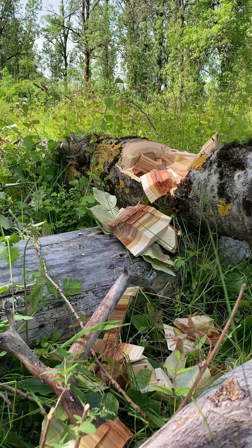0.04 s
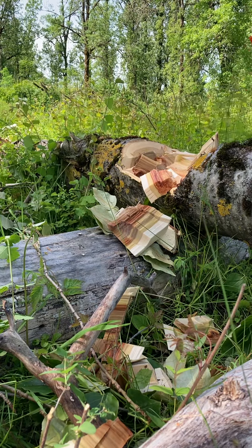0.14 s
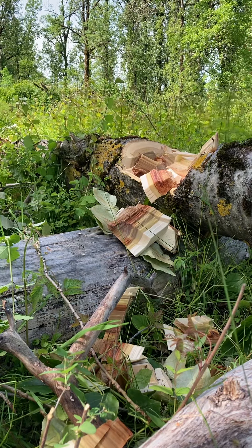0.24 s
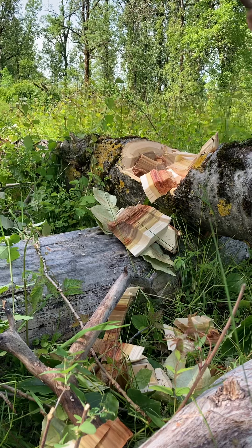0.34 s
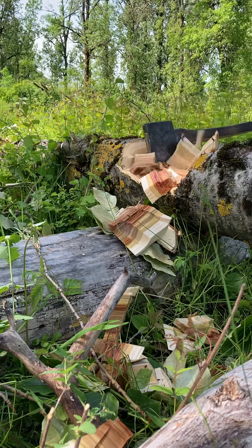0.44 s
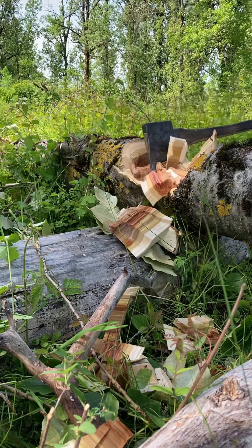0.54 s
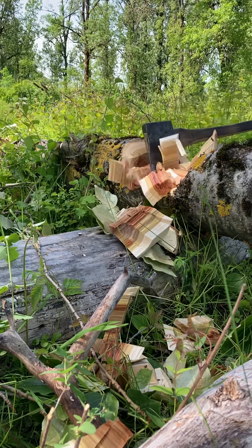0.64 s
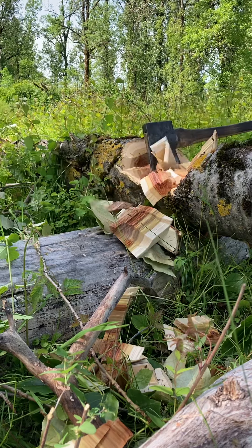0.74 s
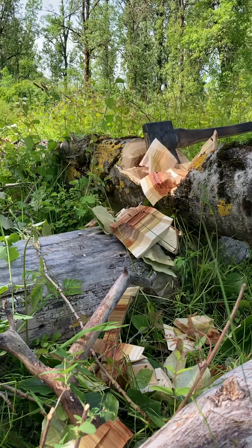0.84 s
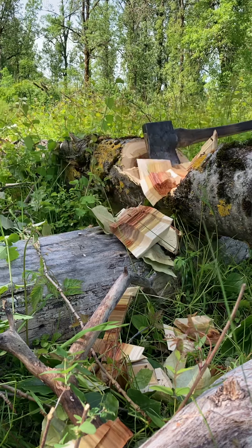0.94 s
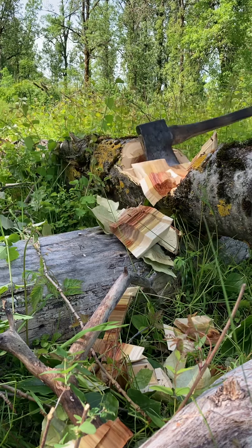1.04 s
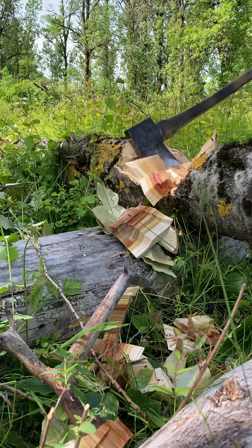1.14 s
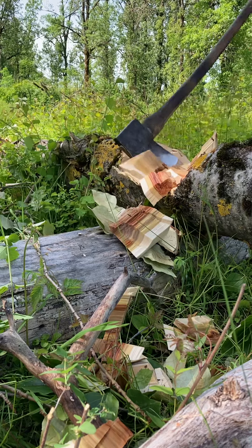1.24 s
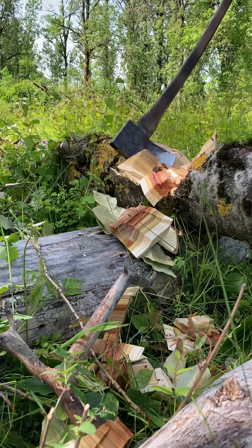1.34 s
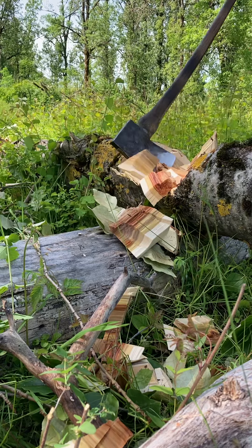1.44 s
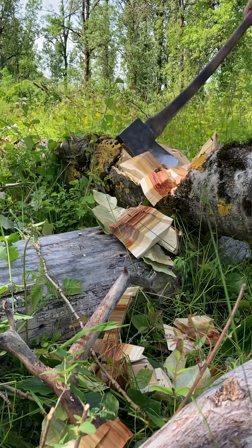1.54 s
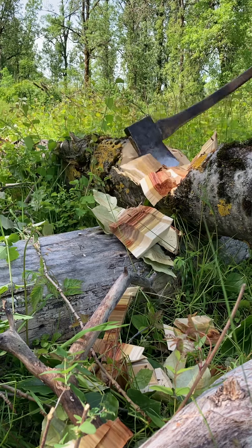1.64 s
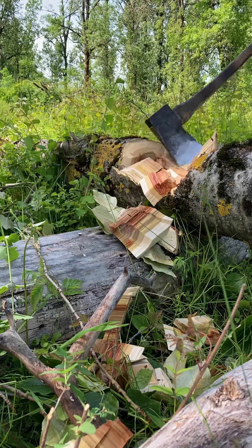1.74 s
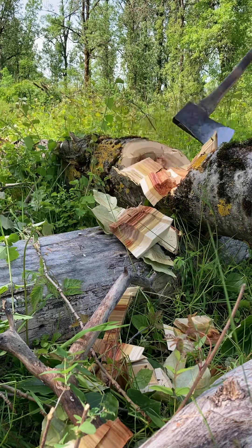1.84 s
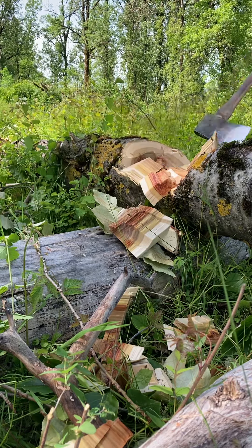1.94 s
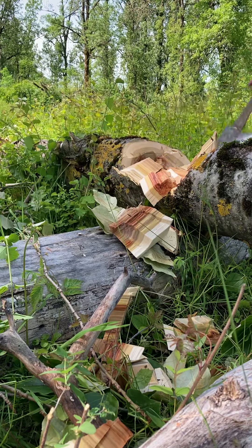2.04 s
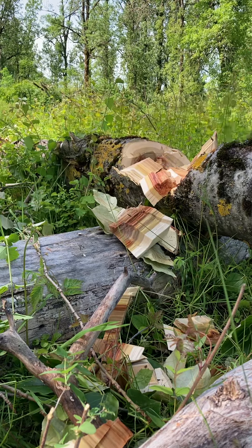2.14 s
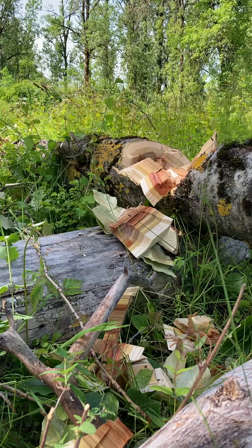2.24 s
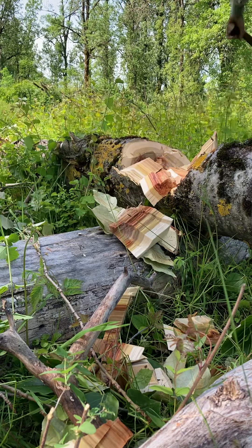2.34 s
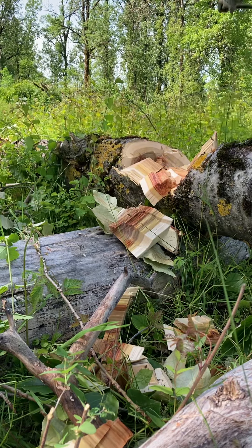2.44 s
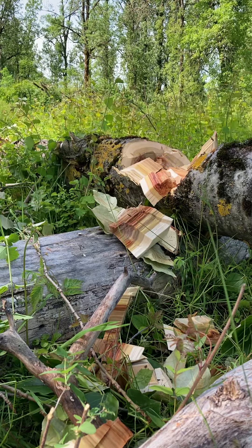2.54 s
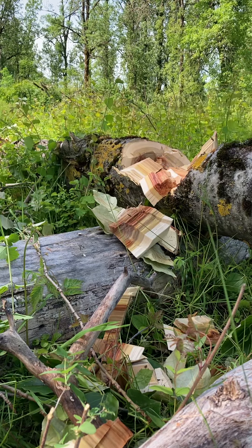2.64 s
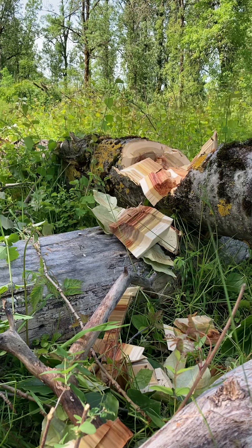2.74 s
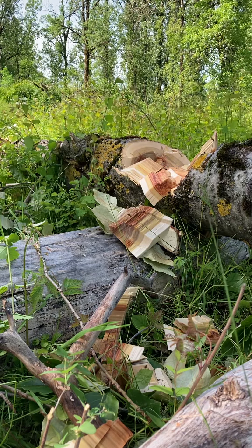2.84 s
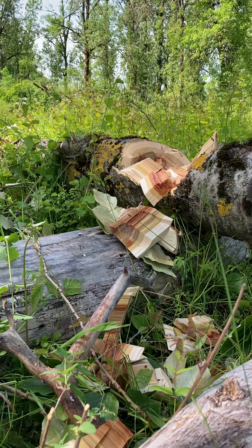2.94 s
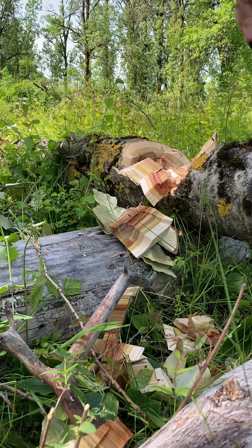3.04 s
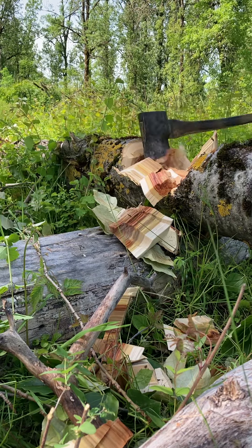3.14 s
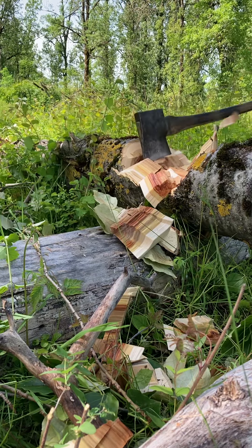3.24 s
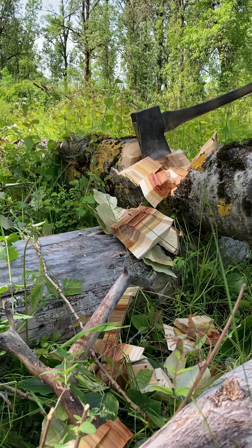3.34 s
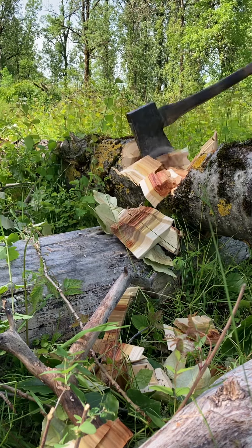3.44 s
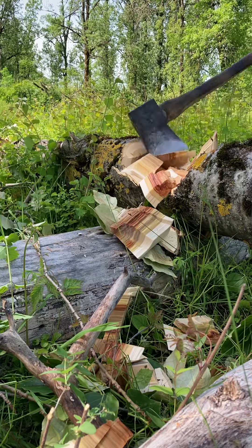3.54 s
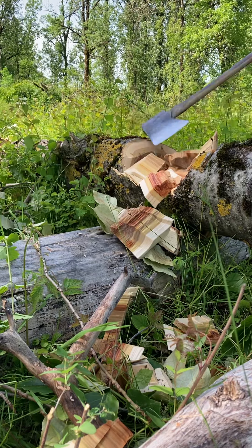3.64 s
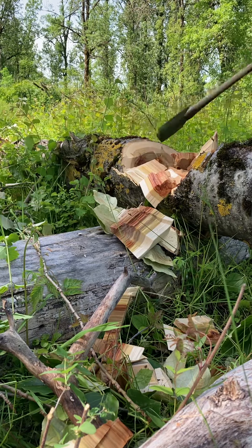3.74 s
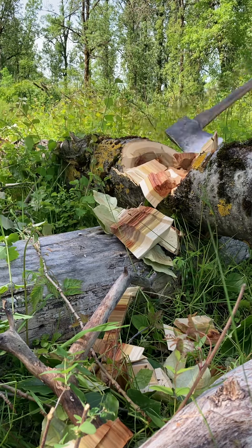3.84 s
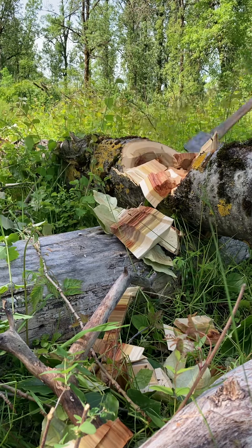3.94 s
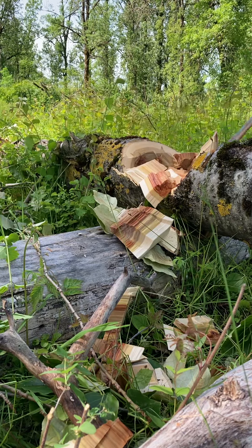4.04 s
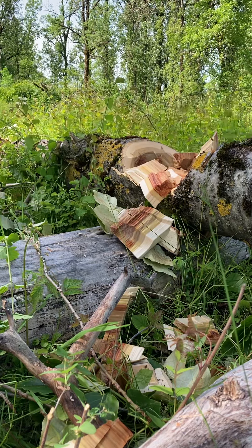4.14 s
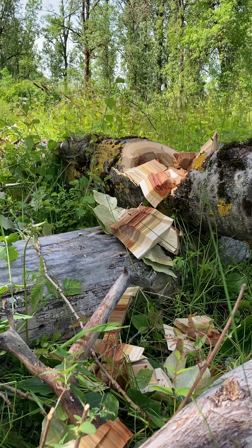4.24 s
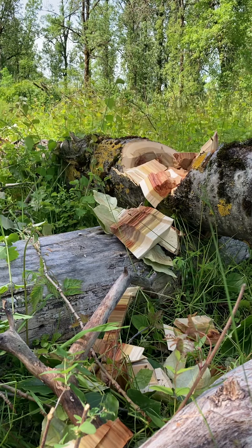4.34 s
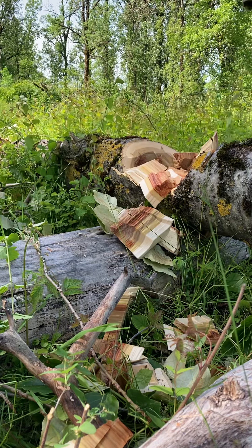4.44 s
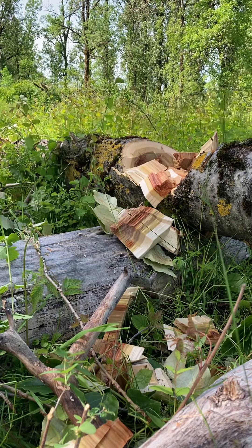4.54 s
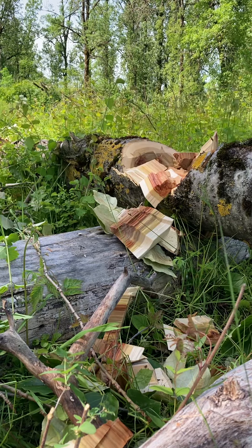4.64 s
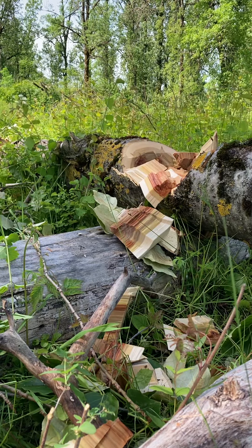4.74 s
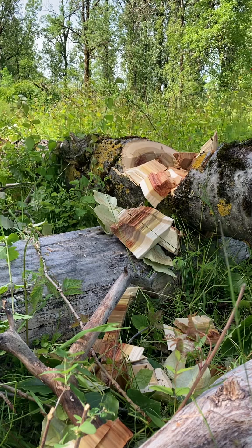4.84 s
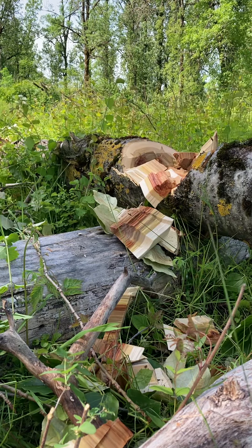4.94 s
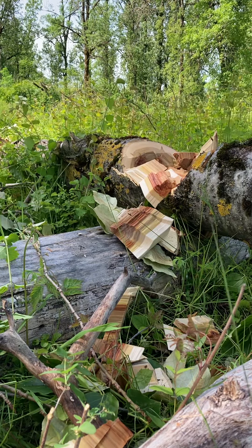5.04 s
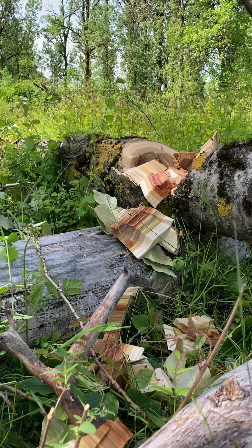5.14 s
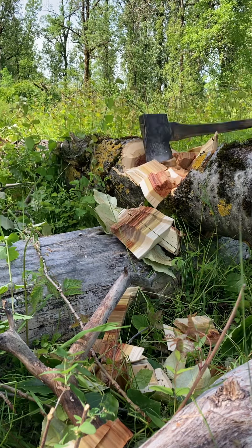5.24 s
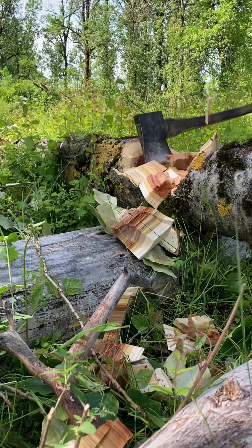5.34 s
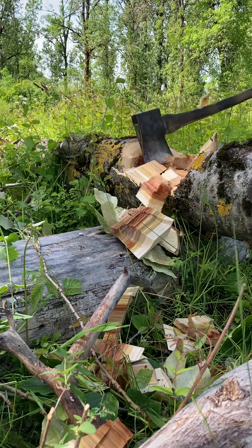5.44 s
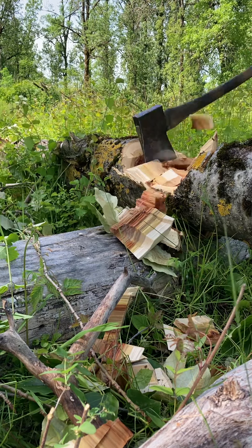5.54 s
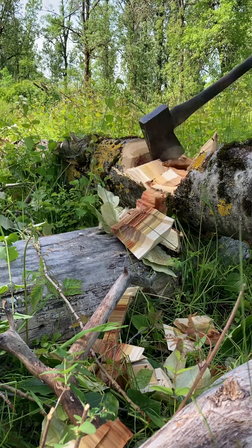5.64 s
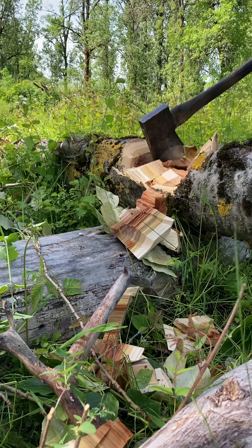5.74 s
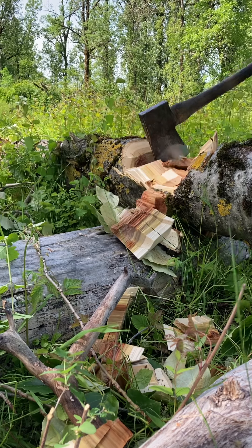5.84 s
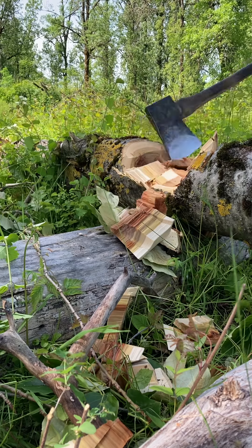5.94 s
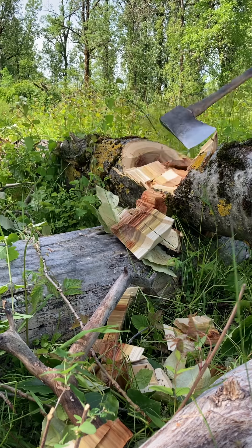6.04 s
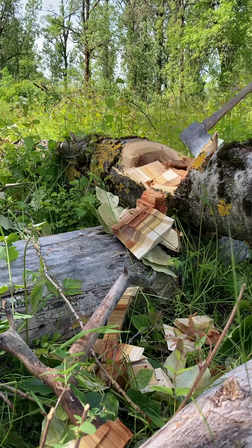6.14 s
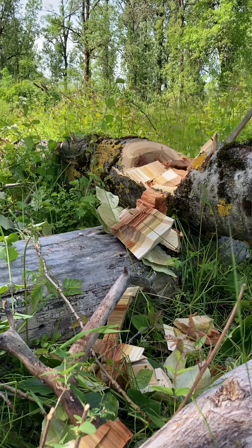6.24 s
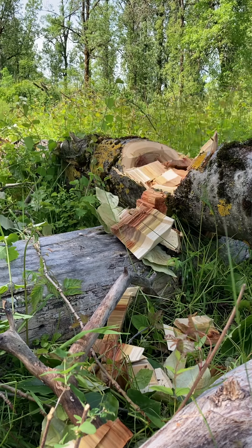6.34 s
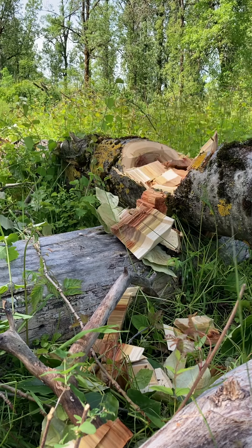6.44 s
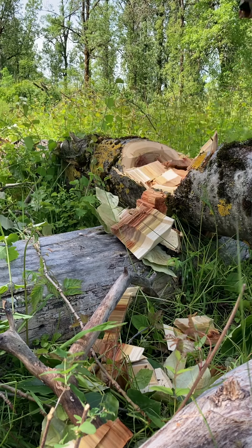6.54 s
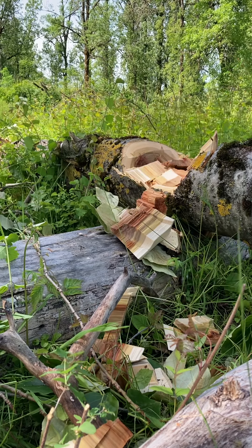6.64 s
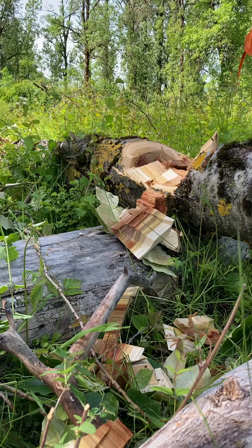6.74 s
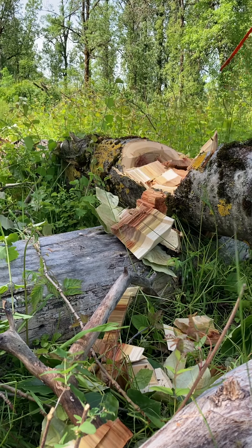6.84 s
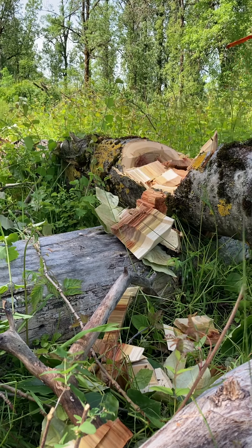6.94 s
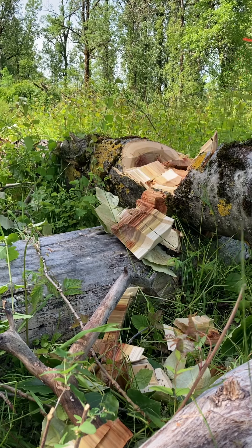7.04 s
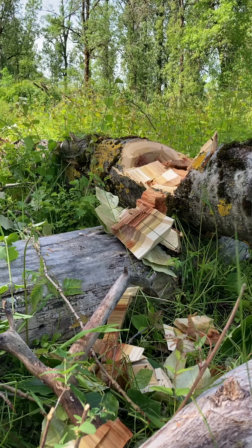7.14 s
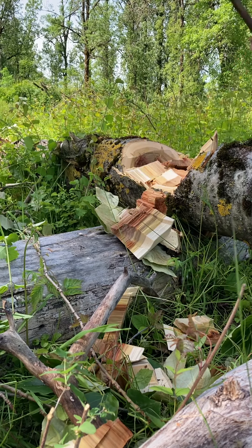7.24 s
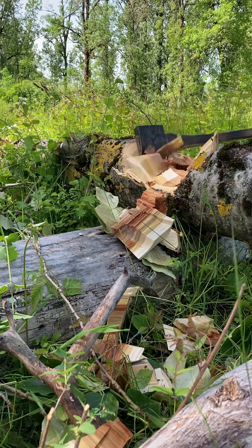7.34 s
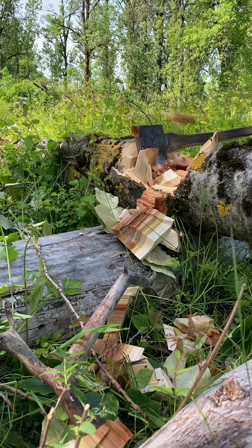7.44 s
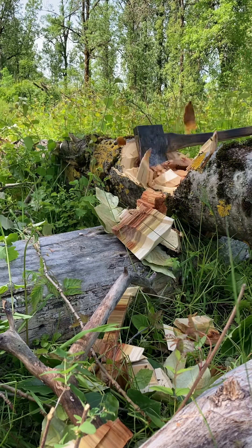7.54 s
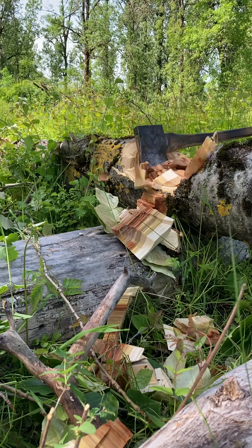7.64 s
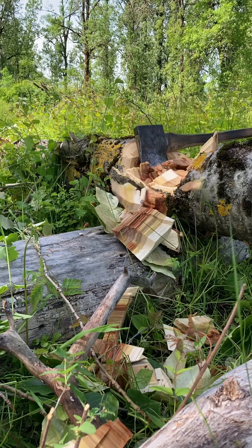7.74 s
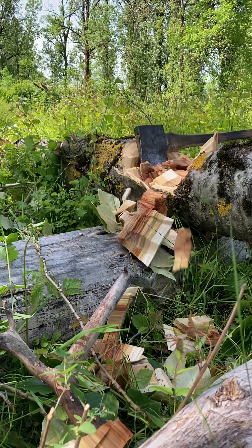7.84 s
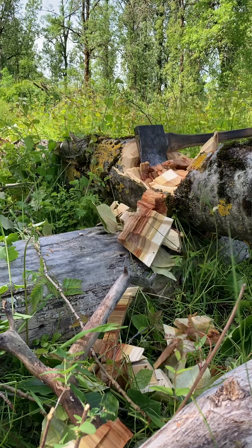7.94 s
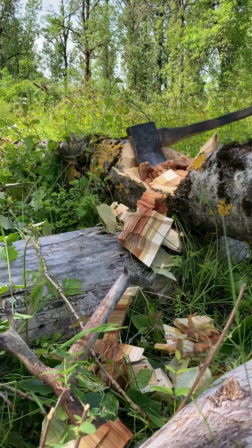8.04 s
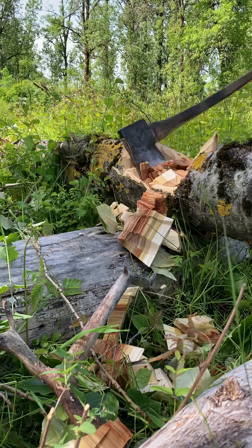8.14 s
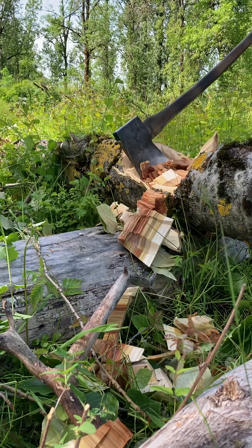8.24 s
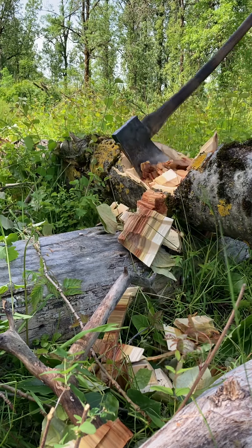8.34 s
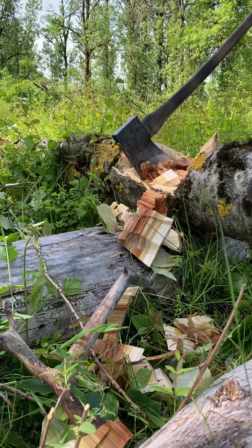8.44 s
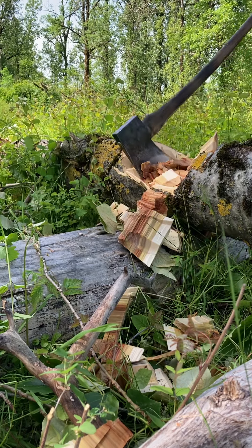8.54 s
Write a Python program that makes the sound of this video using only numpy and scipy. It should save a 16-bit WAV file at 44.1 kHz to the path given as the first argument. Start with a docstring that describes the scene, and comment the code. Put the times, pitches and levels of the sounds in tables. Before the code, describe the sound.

Close stereo outdoors: an axe strikes a felled log four times, a few seconds apart. Each blow is a sharp crack and hollow woody knock with a short low thump and faint echo off trees. Chips tick and clack afterwards, the wedged blade creaks, grass rustles. Thin falling bird whistles fill the gaps over a low wavering engine drone and distant traffic.

```python
"""The edge of a wood: an axe bites four times into a felled log, close to a stereo microphone.
Each blow is noise for the tearing fibres, damped modes for notch and trunk, and a faint noise echo off the trees.
Chips knock as short rings, the wedged blade creaks in slips and slides out singing, and grass is a hiss of contacts.
Behind are birds on gliding sines, far ones blurred by the trunks, and a far engine's drone in a wash of traffic."""
import sys
import numpy as np
from scipy import signal
from scipy.fft import rfft, irfft, next_fast_len
from scipy.io import wavfile
from scipy.ndimage import uniform_filter1d

SR = 44100
rng = np.random.default_rng(int(sys.argv[2]) if len(sys.argv) > 2 else 0)


def transcribe(signal):
    """Save signal, clipped to [-1, 1], as a 16-bit WAV file at the path in sys.argv[1]."""
    frames = np.atleast_2d(signal).T
    limited = np.clip(frames, -1, 1)
    pcm = np.round(limited * 32767).astype(np.int16)
    wavfile.write(sys.argv[1], SR, pcm)


N = 378815
PADDED = next_fast_len(N, real=True)
THIRDS = np.geomspace(80, 16000, 24)  # centres of third-octave bands [Hz]

# Table levels are relative: the functions that play them weigh and sum them.

# Axe blows, close by: (time [s], knock level [dB], frequency where the knock is strongest [Hz],
#   frequency of a dip in the blow's colour [Hz], notch pitch [factor], edge click level [dB], crack level [dB],
#   splintering level [dB], slowness of the cut [factor], trunk delay [s], trunk level [dB],
#   second thump delay [s], second thump level [dB], echo level [dB], bright tail level [dB])
BLOWS = [(0.4330, 8.7, 540, 1480, 1.013, -10, -1.5, -12.5, .85, .0107, 2.7, .0327, -1.4, -4, -51),
         (3.1475, -2, 1150, 620, 1.025, -2.5, 0, -9.5, .78, .0107, -5.5, .0362, -7.8, -2, -50),
         (5.2205, 2.5, 560, 3500, 1.03, -10, -8, -1, 1.7, .0133, .4, .0389, -1.1, -3, -38),
         (7.3255, 5.5, 950, 560, 1.0, -11, -1, -6, 1.2, .0135, -3, .0354, -5.6, -3, -50)]
# Short extra cracks within each blow, each with its own pitch: (time [s], level [dB], pitch [Hz])
EXTRA_CRACKS = [(0.4375, -17, 1680), (3.1495, -19.5, 5400), (3.1525, -22, 1700), (3.1585, -25, 400),
                (5.2225, -22, 2400), (5.2310, -25, 810), (5.2360, -27, 1300), (5.2375, -24, 560),
                (7.3285, -20, 2950), (7.3310, -20, 1850), (7.3335, -14, 1200), (7.3355, -15, 1010),
                (7.3365, -19, 690)]
# Second low thump of the log, about 25 ms after the first: (frequency [Hz], level [dB], t60 [s])
SECOND_THUMP = [(201, -12.2, .061), (287, -9.5, .077), (327, -6.5, .042), (395, -18.1, .032)]
# Echo of the trees, in third octaves: (frequency [Hz], level [dB])
TREE_ECHO = [(80, -70), (300, -64), (1000, -67), (2000, -65), (2700, -60), (4200, -70), (8000, -70),
             (16000, -86)]
CRACK_CYCLES = 30  # damping span of an extra crack [cycles]; tap() takes fractions of it


def axe():
    """The blows crack and stir the trunk, a second low thump follows, and the trees scatter the sound to each port."""
    t = np.arange(2 ** 15) / SR
    near, far = np.zeros(N), np.zeros((2, N))
    for s, *cut, trunk_s, trunk_db, thump_s, thump_db, echo_db, tail_db in BLOWS:
        add(near, *chop(s, *cut, t[:2 ** 13] - .03))
        add(near, s, bright_tail(tail_db, t))
        add(near, s + trunk_s, amp(trunk_db) * trunk(t))
        add(near, s + thump_s, amp(thump_db) * ring(SECOND_THUMP, t, rise=.0022))
        for side in far:
            echo_shape = swell(t - .09, rise=.9, t60=1.1)
            add(side, s, puff(read(TREE_ECHO, THIRDS) + echo_db, echo_shape, grain_db=5))
    around = np.arange(-2 ** 8, 2 ** 12 - 2 ** 8) / SR
    for s, db, hz in EXTRA_CRACKS:
        add(near, s + around[0], tap(around, db, hz, CRACK_CYCLES / hz, scuff_db=-5))
    return near + far


# Wood around the notch, before each blow's pitch factor: (frequency [Hz], level [dB], t60 [s])
NOTCH_MODES = [(183, -9.1, .077), (299, -14.4, .048), (422, -8.2, .04), (636, -11, .036), (791, -9.6, .042),
               (1001, -8, .033), (1183, -11, .033), (1568, -15, .029), (1768, -10, .028), (2010, -12, .03),
               (2317, -10.5, .028), (2560, -12, .036)]
# Tearing fibres, in third octaves: (frequency [Hz], level [dB])
FIBRE_CRACK = [(300, -31), (700, -21), (1100, -17), (1700, -18), (2600, -18), (3500, -22), (5000, -24),
               (7000, -30), (16000, -44)]
# Fine splinters, in third octaves: (frequency [Hz], level [dB])
FINE_SPLINTERS = [(300, -70), (3000, -30), (5200, -18), (6800, -22), (8600, -7), (10500, -21), (13000, -24),
                  (16000, -22)]
# The edge's first click into the wood, in third octaves: (frequency [Hz], level [dB])
EDGE_CLICK = [(300, -60), (2000, -26), (3500, -19), (5200, -16), (6500, -20), (8600, -12), (12500, -20),
              (16000, -17)]
CLICK_RISE_S, CLICK_T60_S = .004, .014
OFF_CENTRE_DB_PER_OCTAVE = 4.8  # loss away from the frequency where the knock is strongest


def chop(s, knock_db, strongest_hz, dip_hz, pitch, click_db, crack_db, splinter_db, slowness, t):
    """The edge clicks in; fibres tear from bright to dull as the blade slows; the notch knocks in damped modes."""
    depth = (1000 / THIRDS[:, None]) ** .5  # duller bands start later and last longer
    age = t - .0006 - slowness * .0028 * depth
    scatter = amp(-22) * depth ** .4 * swell(age, rise=.055 * depth ** .3, t60=.1)
    tear = swell(age, rise=.02 * depth ** .5, t60=.036 * slowness ** .6 * depth ** .6) + scatter
    fibres = amp(read(FIBRE_CRACK, THIRDS) + crack_db)
    splinters = amp(read(FINE_SPLINTERS, THIRDS) + splinter_db)
    tear_db = 10 * np.log10(fibres ** 2 + splinters ** 2)
    crack = burst(tear_db + .5 * dip(THIRDS, dip_hz), tear, grain_db=4)

    modes = []
    for notch_hz, db, t60 in NOTCH_MODES:
        hz = notch_hz * pitch
        off_centre_db = OFF_CENTRE_DB_PER_OCTAVE * abs(np.log2(hz / strongest_hz))
        modes.append((hz, db + knock_db - off_centre_db + dip(hz, dip_hz), t60))
    knock = ring(modes, t, rise=.0025, lag=.007 * slowness)

    click_shape = swell(t - .0012, CLICK_RISE_S, CLICK_T60_S)
    click = puff(read(EDGE_CLICK, THIRDS) + click_db, click_shape, grain_db=2)
    return s + t[0], click + crack + knock


DIP_DB, DIP_OCTAVES = -16, .2  # deepest loss, and its reach to either side


def dip(hz, dip_hz):
    """Loss in dB around a dip in the blow's colour."""
    return DIP_DB * np.exp(-(np.log2(hz / dip_hz) / DIP_OCTAVES) ** 2)


# Bright tail after the crack, in third octaves: (frequency [Hz], level [dB])
BRIGHT_TAIL = [(300, -60), (2600, -7), (5200, -9), (6800, -7), (8600, 0), (10500, -9), (13000, -19),
               (16000, -21)]
TAIL_CLUMP_DB, TAIL_DELAY_S, TAIL_T60_S = 3, .018, .17


def bright_tail(db, t):
    """A short, uneven tail of bright noise after the crack."""
    clumps = evened(amp(TAIL_CLUMP_DB * wander(len(t), hz=120)))
    shape = clumps * swell(t - TAIL_DELAY_S, rise=.04, t60=TAIL_T60_S)
    return puff(read(BRIGHT_TAIL, THIRDS) + db, shape, grain_db=4)


# The whole log: (frequency [Hz], level [dB], t60 [s])
LOG_MODES = [(85, -26, .6), (160, -24, .354), (200, -21.6, .39), (245, -29.7, .38), (279, -18.4, .247),
             (319, -19.3, .195), (355, -22, .2), (397, -22.5, .17), (434, -31, .162), (489, -35, .17),
             (574, -34, .15), (680, -29, .13), (812, -30, .1), (1005, -36, .09)]
# The log's dull rumble, in third octaves: (frequency [Hz], level [dB])
LOG_RUMBLE = [(80, -35), (150, -32), (300, -32), (450, -44), (700, -50), (1200, -66), (16000, -100)]


def trunk(t):
    """The whole log rings along its length, its lowest modes longest, over a dull rumble."""
    rumble = puff(read(LOG_RUMBLE, THIRDS) - 4.5, swell(t - .02, rise=.06, t60=.3), grain_db=0)
    return ring(LOG_MODES, t, rise=.003) + rumble


# Chips landing and the blade nudging the wood: (time [s], hollow knock level [dB], knock pitch [Hz],
#   bright clack level [dB], clack pitch [Hz], trunk level [dB])
CHIPS = [(0.771, -48, 1080, -45, 2800, -52), (0.889, -48, 480, -66, 2200, -42),
         (0.991, -35, 660, -38, 1800, -29), (0.997, -43, 900, -48, 2500, -42),
         (1.021, -51, 550, -66, 2000, -45), (3.402, -54, 1100, -51, 1900, -58),
         (3.427, -52, 1000, -50, 2100, -56), (3.458, -52, 1100, -60, 2200, -58),
         (3.615, -33.5, 845, -50, 2500, -42), (3.661, -38, 1160, -53, 2600, -44),
         (3.704, -46, 950, -60, 1700, -48), (5.547, -51, 1150, -49, 2000, -56),
         (6.495, -62, 900, -56, 2200, -58), (7.851, -60, 800, -49, 2900, -54),
         (7.863, -48, 540, -47, 2000, -41), (7.951, -56, 1200, -50, 3800, -56),
         (7.975, -40, 960, -38, 2080, -36), (7.982, -39, 450, -47, 1400, -38),
         (8.049, -56, 1400, -51, 2700, -54)]
# Overtones of a hollow knock: (multiple of the knock pitch [ratio], level [dB], t60 [s])
HOLLOW_OVERTONES = [(1.35, -13, .03), (1.8, -11, .035), (2.3, -18, .03)]
# The loudest stalks snapping: (time [s], level [dB])
SNAPS = [(0.528, -52.5), (0.733, -49.5), (0.772, -49.5), (2.108, -51.5), (3.372, -45), (3.537, -47),
         (3.614, -46), (3.661, -52), (4.257, -47), (4.408, -49), (5.124, -46), (5.143, -51), (5.547, -45),
         (5.624, -49), (7.108, -57), (7.654, -46), (7.728, -53), (7.85, -51), (8.113, -49)]
# Colour of leaves and stalks: (frequency [Hz], level [dB])
LEAVES = [(300, -40), (2000, -15), (4000, -10), (6000, -6), (8500, -1), (11000, -4), (14000, -7),
          (16000, -14)]
KNOCK_DAMPING_S, CLACK_DAMPING_S = .062, .03  # tap() takes fractions of these


def debris():
    """Chips knock and clack and stir the trunk; stalks snap as short bright noise."""
    t, out = np.arange(-2 ** 8, 2 ** 12 - 2 ** 8) / SR, np.zeros(N)
    for s, knock_db, hz, clack_db, clack_hz, trunk_db in CHIPS:
        modes = [(hz * ratio, knock_db + db, t60) for ratio, db, t60 in HOLLOW_OVERTONES]
        overtones = ring(modes, t, rise=.001)
        knock = tap(t, knock_db, hz, KNOCK_DAMPING_S, scuff_db=-5) + overtones
        clack = tap(t, clack_db, clack_hz, CLACK_DAMPING_S, scuff_db=-1)
        add(out, s + t[0], knock + clack)
        add(out, s, amp(trunk_db) * trunk(np.arange(2 ** 14) / SR))
    for s, db in SNAPS:
        snap = puff(db - 4 + read(LEAVES, THIRDS), swell(t, rise=.005, t60=.04), grain_db=5)
        add(out, s + t[0], snap)
    return out


TAP_DB_PER_OCTAVE, TAP_RISE_S = 9, .005  # the slope is exact one octave away and steepens beyond


def tap(t, db, hz, damping_s, scuff_db):
    """A short knock or crack of wood: a tick of noise over a quickly damped resonance."""
    colour_db = -TAP_DB_PER_OCTAVE * abs(np.log2(THIRDS / hz)) ** 1.4
    tick_shape = swell(t, rise=TAP_RISE_S, t60=.8 * damping_s)
    tick = puff(db + scuff_db + colour_db, tick_shape, grain_db=4)
    return tick + ring([(hz, db + 2.5, .7 * damping_s)], t, rise=.0007)


# The blade rocks in the cut and splinters rub: (time [s], length [s], level [dB], centre frequency [Hz])
SCRAPES = [(1.02, .17, -63, 2100), (3.24, .15, -58.5, 2800), (3.258, .018, -53, 3100),
           (3.385, .055, -55.5, 2300), (3.522, .07, -54, 2500), (3.62, .07, -63, 2000),
           (4.14, .13, -68, 2600), (7.365, .07, -59, 2800), (7.425, .115, -54.5, 2750),
           (7.835, .06, -60, 2700), (7.925, .035, -55, 3200), (8.02, .14, -56.5, 2400)]
# A splinter plucked by a slip: (multiple of the centre frequency [ratio], level [dB], t60 [s])
SPLINTER_MODES = [(.41, -7, .012), (.55, -5, .01), (.73, -3.5, .009), (1, 0, .012), (1.35, -8, .005),
                  (2, -8, .003)]
SLIPS_PER_S, SLIP_DB = 110, -2  # approximate rate, and level against the scrape
SLIP_SPREAD_DB, SLIP_DETUNE = 20, .25  # full range of random softness, and of pitch as a share
SCRAPE_DB_PER_OCTAVE, SCRAPE_RUB_DB = 9, -6  # slope one octave away; the rub against the scrape


def creaks():
    """The wedged blade sticks and slips: each uneven slip rings a splinter, over a dry rub."""
    t, out = np.arange(2 ** 10) / SR, np.zeros(N)
    for s, length, db, hz in SCRAPES:
        size = next_fast_len(int(length * SR))
        stroke = signal.windows.tukey(size, .7) * evened(amp(3 * wander(SR, hz=45)[:size]))
        colour_db = -SCRAPE_DB_PER_OCTAVE * abs(np.log2(THIRDS / hz)) ** 1.2
        add(out, s, puff(db + SCRAPE_RUB_DB + colour_db, stroke, grain_db=6))

        count = int(length * SLIPS_PER_S) + 1
        slips = np.zeros(size + len(t))
        for k, (when, softness, pitch) in enumerate(rng.random((count, 3))):
            place = (k + when) / count  # share of the scrape gone by
            centre_hz = hz * (1 + SLIP_DETUNE * (pitch - .5))
            modes = [(centre_hz * ratio, mode_db - SLIP_SPREAD_DB * softness, t60)
                     for ratio, mode_db, t60 in SPLINTER_MODES]
            pressure = np.sin(np.pi * place) ** .5
            add(slips, place * length, pressure * ring(modes, t, rise=.0002))
        add(out, s, amp(db + SLIP_DB) * evened(slips) * np.sqrt(size / len(slips)))
    return out


# The blade slides out of the cut: (time [s], length [s], level [dB])
SLIDES = [(1.68, 0.02, -69), (5.87, .12, -75), (5.976, .025, -62)]
# The singing steel: (frequency [Hz], level [dB], t60 [s])
BLADE_MODES = [(2700, -2, .035), (5050, -2, .025), (7980, 0, .04), (9400, -12, .03), (11300, -7, .03),
               (12700, -10, .03), (14250, -7, .07)]
RUB_DB = -3  # the dry rubbing under the ring of the steel


def blade():
    """Wood rubs the steel head: noise drives the modes of the blade, which sings faintly."""
    out, steel = np.zeros(N), ring(BLADE_MODES, np.arange(2 ** 12) / SR, rise=.001)
    for s, length, db in SLIDES:
        stroke = np.hanning(int(length * SR))
        friction = rng.standard_normal(len(stroke)) * stroke
        add(out, s, amp(db - 5.5) * evened(signal.fftconvolve(friction, steel)))
        add(out, s, puff(db + RUB_DB + read(LEAVES, THIRDS), stroke, grain_db=4))
    return out


# Grass brushed by a step or a falling chip: (time of the peak [s], time to die away [s], level [dB])
RUSTLES = [(0.24, 1.2, -77), (0.82, .9, -67), (1.2, 3.0, -70), (1.72, .4, -68), (2.11, .9, -67),
           (2.35, .3, -61), (3.4, .5, -62.5), (3.56, .5, -59.5), (3.82, .45, -60), (4.21, .6, -56),
           (5.13, .4, -69), (5.56, .9, -66), (6.34, .6, -59), (6.5, .5, -67), (7.17, .9, -76),
           (7.94, .7, -55), (8.3, 1.2, -72)]
# Faint hiss of leaves between the rustles: (time [s], level [dB])
BREEZE = [(0.0, -85), (0.65, -75), (4.16, -78), (4.88, -91), (5.4, -68), (6.17, -89), (8.06, -71),
          (8.59, -83)]
BREEZE_GAIN_DB = -2
RUSTLE_RISE_SHARE = .45  # a rustle builds up in this share of the time it takes to die
SHAKE_DELAY_S, SHAKE_RISE_S, SHAKE_T60_S = .04, .1, .8  # each blow shakes the plants around the log
SHAKE_DB = -58.5  # added to the blow's splintering level
CONTACTS_PER_S, CONTACT_SPREAD_DB = 7000, 2.6
FLUTTER_DB, FLUTTER_HZ = 2.6, 30  # leaves are touched in small uneven clumps


def grass():
    """Countless tiny leaf contacts, swelling as the plants are brushed or shaken by a blow."""
    hz, t = np.fft.rfftfreq(PADDED, 1 / SR), np.arange(N) / SR
    sizes = amp(CONTACT_SPREAD_DB * np.minimum(rng.exponential(1, N), 5))
    contacts = rng.standard_normal(N) * (rng.random(N) < CONTACTS_PER_S / SR) * sizes
    colour = amp(read(LEAVES, hz)) / np.sqrt(hz + 1)
    hiss = irfft(rfft(contacts, PADDED) * colour, PADDED)[:N]

    slow = t[::2 ** 6]
    power = amp(np.interp(slow, *np.transpose(BREEZE)) + BREEZE_GAIN_DB) ** 2
    for s, fade_s, db in RUSTLES:
        power += (amp(db + 2) * swell(slow - s, RUSTLE_RISE_SHARE * fade_s, fade_s)) ** 2
    for s, _, _, _, _, _, _, splinter_db, *_ in BLOWS:
        shake = swell(slow - s - SHAKE_DELAY_S, SHAKE_RISE_S, SHAKE_T60_S)
        power += (amp(SHAKE_DB + splinter_db) * shake) ** 2
    flutter = amp(FLUTTER_DB * wander(PADDED, FLUTTER_HZ)[:N])
    return evened(hiss * flutter) * np.sqrt(np.interp(t, slow, power))


# A bird's whistles, each gliding to a resting note: (time [s], length [s], first pitch [Hz],
#   resting pitch [Hz], bend of the glide [exponent], level [dB], level change over the note [dB])
WHISTLES = [(1.14, .33, 4550, 3850, .6, -68.5, -2), (2.63, .1, 4750, 3280, 1.4, -61, -4),
            (2.726, .148, 4930, 3880, 2.8, -53, 2), (2.885, .18, 4750, 3880, 3.5, -57.5, -9),
            (3.77, .13, 4050, 3870, 1.5, -70, 0), (4.01, .11, 3920, 3850, 1, -65, 4),
            (4.965, .26, 6750, 4300, 2.8, -60, -2), (5.28, .36, 4200, 3790, 2.5, -64, -2),
            (6.02, .17, 4300, 3900, .8, -68, 0), (7.385, .15, 4450, 3850, 1.5, -59.5, 5),
            (7.53, .21, 4800, 3870, 3.8, -57.5, -9), (8.22, .2, 4300, 3850, 1.5, -70.5, -2)]
# A slurred call that lifts, holds, then drops: (time [s], length [s], level [dB])
SLURS = [(2.56, .06, -63), (6.15, .14, -63)]
# Pitch of the slur: (share of the length [0-1], pitch [Hz])
SLUR_PITCH = [(0, 4200), (.25, 4450), (.7, 4380), (1, 3750)]
TRUNKS_DB, TRUNKS_T60_S = -10, .25  # reflections against the direct calls


def birds():
    """Falling whistles and slurs, followed by faint reflections among the trunks."""
    out = np.zeros(N)
    for s, length, first_hz, rest_hz, bend, db, change_db in WHISTLES:
        decay = np.exp(-bend * np.linspace(0, 1, int(length * SR)))
        glide = (decay - decay[-1]) / (1 - decay[-1])  # from 1 to 0
        add(out, s, whistle(rest_hz + (first_hz - rest_hz) * glide, db, change_db))
    for s, length, db in SLURS:
        share = np.linspace(0, 1, int(length * SR))
        add(out, s, whistle(np.interp(share, *np.transpose(SLUR_PITCH)), db))
    return out + amp(TRUNKS_DB) * among_trees(out, t60=TRUNKS_T60_S)


WHISTLE_WAVER_DB, WHISTLE_WAVER_HZ = 2.2, 18  # moving air makes the calls fade in and out


def whistle(hz, db, change_db=-4):
    """A pure note on a pitch curve, with soft ends, wavering and swelling or fading as it goes."""
    size = len(hz)
    waver_db = WHISTLE_WAVER_DB * wander(SR, WHISTLE_WAVER_HZ)[:size]
    level_db = db + change_db * np.linspace(-.5, .5, size) + waver_db
    tone = np.sin(2 * np.pi * np.cumsum(hz) / SR)
    return signal.windows.tukey(size, .3) * amp(level_db) * tone


# Calls from deep in the wood, heard by reflection: (time [s], length [s], first pitch [Hz],
#   last pitch [Hz], level [dB])
FAR_CALLS = [(4.16, .1, 3950, 3750, -71), (4.3, .14, 4000, 3550, -72), (4.4, .16, 3550, 3950, -73),
             (4.57, .15, 3850, 3300, -71), (4.6, .1, 3900, 4250, -74), (4.68, .1, 4000, 3600, -75),
             (5.04, .09, 3550, 3700, -70)]
# a farther bird repeats one thin falling chirp
CHIRP_START_S, CHIRP_EVERY_S, CHIRP_S = 6.73, .137, .065
CHIRP_FROM_HZ, CHIRP_TO_HZ, CHIRP_DB = 7500, 6200, -78
FAR_T60_S, CHIRP_T60_S = .55, .08  # reverberation among the trunks


def far_birds(count=4):
    """Overlapping curved calls and a run of thin chirps, blurred by many trunks on their way."""
    calls, chirps = np.zeros((2, N))
    for s, length, first_hz, last_hz, db in FAR_CALLS:
        bend = np.sin(np.linspace(0, np.pi / 2, int(length * SR)))
        add(calls, s, whistle(first_hz + (last_hz - first_hz) * bend, db))
    for k in range(count):
        pitch = np.geomspace(CHIRP_FROM_HZ, CHIRP_TO_HZ, int(CHIRP_S * SR))
        add(chirps, CHIRP_START_S + k * CHIRP_EVERY_S, whistle(pitch, CHIRP_DB))
    return among_trees(calls, t60=FAR_T60_S) + among_trees(chirps, t60=CHIRP_T60_S)


def among_trees(sound, t60):
    """Dense reflections from the trunks: a decaying noise response, different at each port."""
    tail = rng.standard_normal((2, SR)) * swell(np.arange(SR) / SR, rise=1, t60=t60)
    return signal.fftconvolve(sound[None], evened(tail) / np.sqrt(SR), axes=1)[:, :N]


# Far engine's drone, wavering in pitch and level: (time [s], pitch [Hz], level [dB])
ENGINE = [(0.0, 104.9, -51), (1.2, 115.1, -49), (3.2, 111, -47.5), (3.56, 110.3, -45), (3.9, 99.5, -45.5),
          (4.7, 105.5, -45.5), (5.1, 108.6, -49), (5.55, 105.4, -51), (5.81, 115.7, -50),
          (6.44, 107.4, -55), (6.62, 120.2, -54), (6.77, 106.7, -55), (7.03, 111.4, -46), (7.44, 95.0, -42),
          (7.54, 101.1, -44), (8.59, 97.7, -38)]
# Distant traffic and air: (frequency [Hz], level per hertz [dB])
FAR_AIR = [(20, -86), (35, -72), (52, -61), (80, -60), (115, -66), (170, -74.5), (260, -79), (450, -87.5),
           (950, -82), (1400, -85.7), (2100, -95), (3200, -106), (6000, -120), (16000, -136)]
# Left-right likeness of that wash: (frequency [Hz], likeness [0-1])
LIKENESS = [(50, .99), (250, .96), (500, .65), (1000, .5), (1600, .4), (4000, .45), (16000, .7)]
ENGINE_GAIN_DB, WAVER_DB = 4, 1.4


def distance():
    """A wavering sine for the engine's drone, in a wash of coloured noise for far traffic."""
    hz, t = np.fft.rfftfreq(PADDED, 1 / SR), np.arange(N) / SR
    a, b = rfft(rng.standard_normal((2, PADDED)))
    same = np.clip(read(LIKENESS, hz), 0, 1)
    pair = np.array([a, same * a + np.sqrt(1 - same ** 2) * b])
    wash = irfft(pair * amp(read(FAR_AIR, hz)), PADDED)[:, :N]

    s, pitch, db = np.transpose(ENGINE)
    waver_db = WAVER_DB * wander(PADDED, hz=6)[:N]
    phase = 2 * np.pi * np.cumsum(np.interp(t, s, pitch)) / SR
    drone = amp(np.interp(t, s, db) + ENGINE_GAIN_DB + waver_db) * np.sin(phase)

    # moving air makes far sound fade in patches of time and frequency
    bands_hz, _, cells = signal.stft(wash, SR, nperseg=2 ** 10)
    patches = uniform_filter1d(rng.standard_normal(cells.shape[1:]), size=5, axis=0)
    patches = uniform_filter1d(patches, size=6, axis=1)
    mottle_db = 1.8 * evened(patches) * (bands_hz[:, None] > 200) - 1
    wash = signal.istft(cells * amp(mottle_db), SR)[1][:, :N]
    return wash * np.sqrt(SR / 2) + drone


def amp(db):
    """Decibels to gain."""
    return 10 ** (np.asarray(db) / 20)


def evened(x):
    """Scales each row to rms 1."""
    return x / np.sqrt(np.mean(x ** 2, -1, keepdims=True) + 1e-30)


def read(points, hz, column=1):
    """Reads a table on a log-frequency axis."""
    points = np.array(points, float)
    return np.interp(np.log(hz + 1), np.log(points[:, 0] + 1), points[:, column])


def add(mix, s, sound):
    """Mixes a sound in at time s."""
    part = mix[max(round(s * SR), 0):][:len(sound)]
    part += sound[:len(part)]


def swell(t, rise, t60):
    """Grows by 60 dB within rise up to t = 0, then dies away by 60 dB in t60."""
    return np.exp(-np.log(1000) * np.maximum(-t / rise, t / t60))


def wander(size, hz):
    """Slow chance of rms 1, changing up to about hz times a second."""
    rates = np.fft.rfftfreq(size, 1 / SR)
    return evened(irfft(rfft(rng.standard_normal(size)) / (1 + (rates / hz) ** 4), size))


def ring(modes, t, rise, lag=0):
    """Damped modes with a soft start; low bending waves travel slowly and arrive later."""
    hz, db, t60 = np.transpose(modes)[:, :, None]
    age = np.maximum(t - lag * np.sqrt(200 / hz), 0)
    onset = -np.expm1(-np.minimum(age / rise, 10) ** 2)
    return (amp(db - 60 * age / t60) * onset * np.sin(2 * np.pi * hz * age)).sum(0)


def grainy(size, grain_db):
    """White noise whose level jumps at random every 16 samples."""
    steps = np.repeat(rng.standard_normal(size // 2 ** 4 + 1), 2 ** 4)[:size]
    return rng.standard_normal(size) * amp(grain_db * steps)


def burst(levels_db, shape, grain_db=0):
    """Third-octave bands of grainy noise, each with its own level and envelope (bands x samples)."""
    size = shape.shape[-1]
    numbers = np.arange(len(THIRDS))
    place = np.interp(np.fft.rfftfreq(size, 1 / SR), THIRDS, numbers)
    window = np.maximum(1 - abs(place - numbers[:, None]), 0)  # overlapping triangles
    bands = irfft(window * rfft(grainy(size, grain_db)), size)
    strength = np.sqrt(np.mean(shape ** 2, -1, keepdims=True))
    return amp(levels_db) @ (evened(bands * shape) * strength) * np.sqrt(2 / 3)


def puff(levels_db, shape, grain_db):
    """Grainy noise under one envelope, coloured by third-octave levels."""
    size = len(shape)
    hz = np.fft.rfftfreq(size, 1 / SR)
    source = evened(grainy(size, grain_db) * shape) * np.sqrt(np.mean(shape ** 2))
    band_width = np.maximum(hz, THIRDS[0]) * np.log(THIRDS[1] / THIRDS[0])
    colour = amp(np.interp(hz, THIRDS, levels_db)) * np.sqrt(SR / 2 / band_width)
    return irfft(rfft(source) * colour, size)


def scene():
    """Everything heard at the log, from the axe to the far engine."""
    near = axe() + debris() + creaks() + blade() + grass()
    return near + birds() + far_birds() + distance()


# The two microphone ports: (frequency [Hz], lead of the left [rad], left minus right [dB])
PORTS = [(100, 0, 3), (280, -0.4, 3), (570, -0.8, 5), (800, -1.33, 2.5), (1050, -1.27, -0.5),
         (2400, -1.45, -0.5), (3300, -1.6, 0), (4700, -2.75, 1), (6000, -2.55, 0), (7700, -0.97, 0),
         (9000, 0.26, 0.5), (11600, 3, 0), (14500, 5.5, 0)]
LOW_CUT_HZ, EDGE_HZ = 41, 16200  # lower and upper limits of the sound


def record(dry):
    """The deepest bass is cut; the ports differ in phase and level; loud peaks are rounded; then the band limit."""
    hz = np.fft.rfftfreq(PADDED, 1 / SR)
    tilt = amp(read(PORTS, hz, column=2) / 2) * np.exp(.5j * read(PORTS, hz))  # half to each port
    low_cut = signal.butter(2, LOW_CUT_HZ, "high", fs=SR, output="sos")
    lean = signal.sosfilt(low_cut, dry)
    pair = irfft(rfft(lean, PADDED) * np.array([tilt, 1 / tilt]), PADDED)[:, :N]
    rounded = pair / np.sqrt(np.hypot(1, (pair / .92) ** 2))  # never beyond .92
    band_limit = signal.firwin(255, EDGE_HZ, window=("kaiser", 9), fs=SR)
    return signal.oaconvolve(rounded, band_limit[None], "same")


dry = scene()
out = record(dry)
transcribe(out)
```